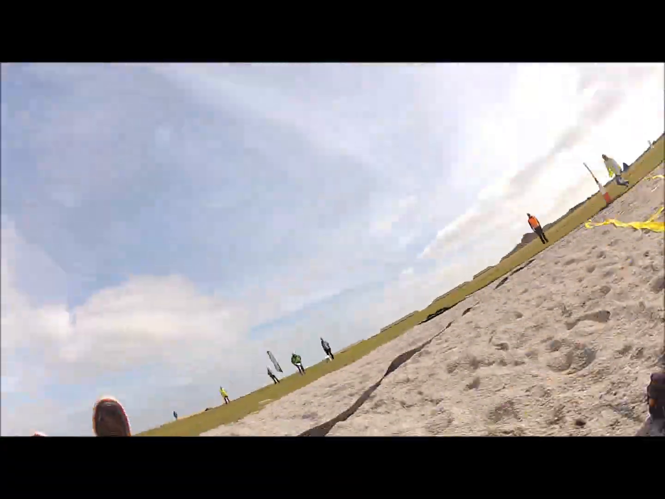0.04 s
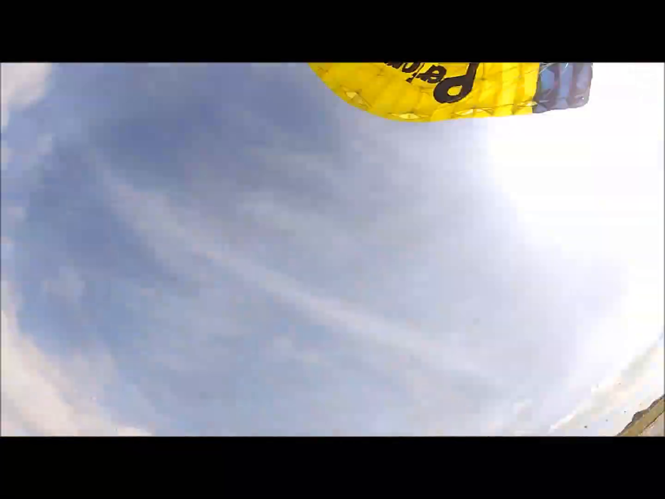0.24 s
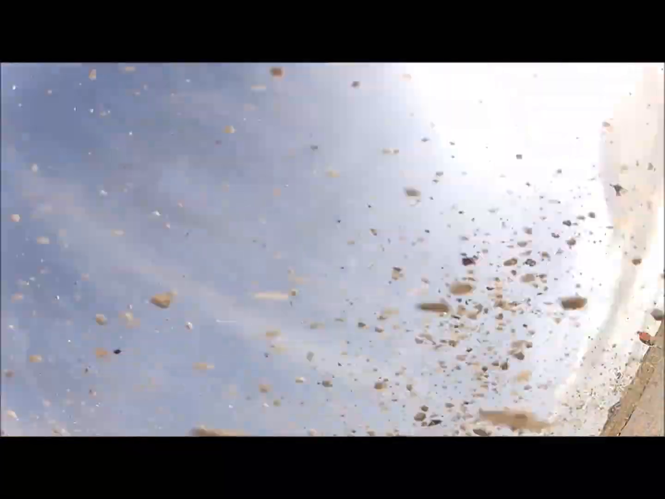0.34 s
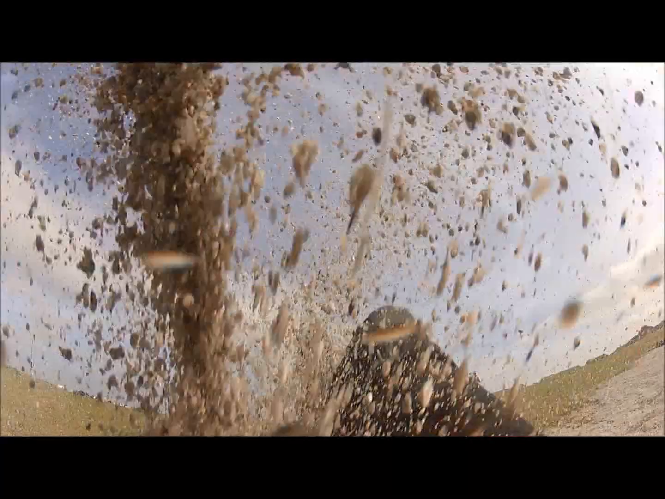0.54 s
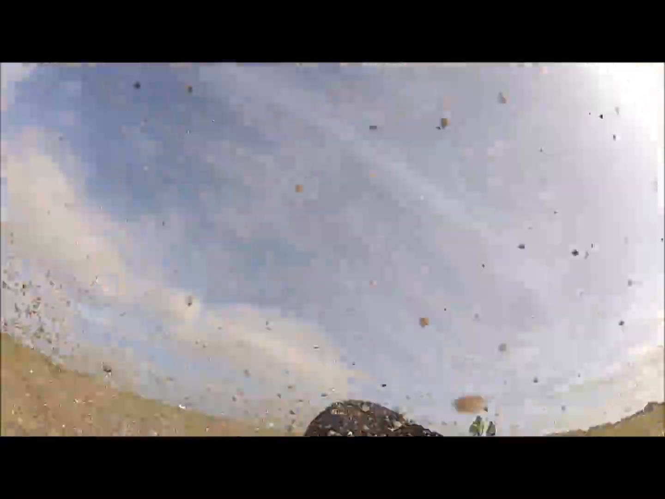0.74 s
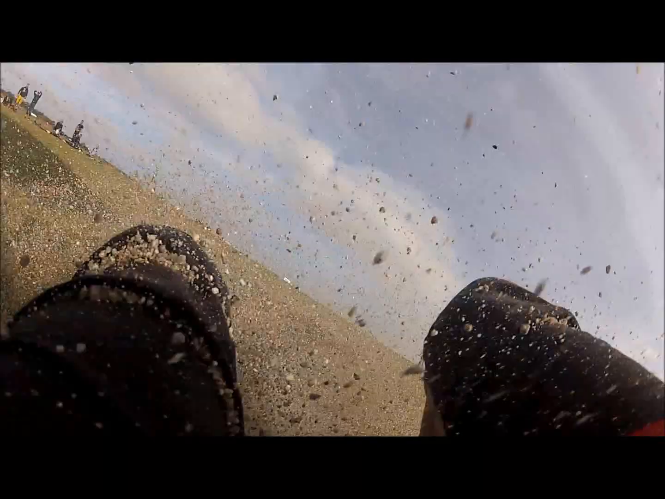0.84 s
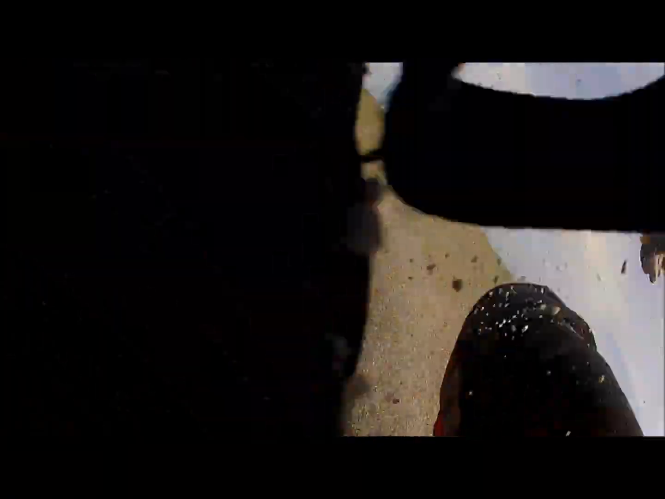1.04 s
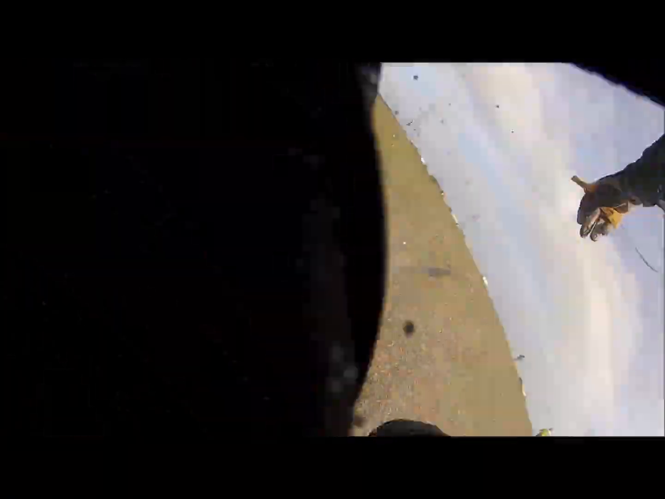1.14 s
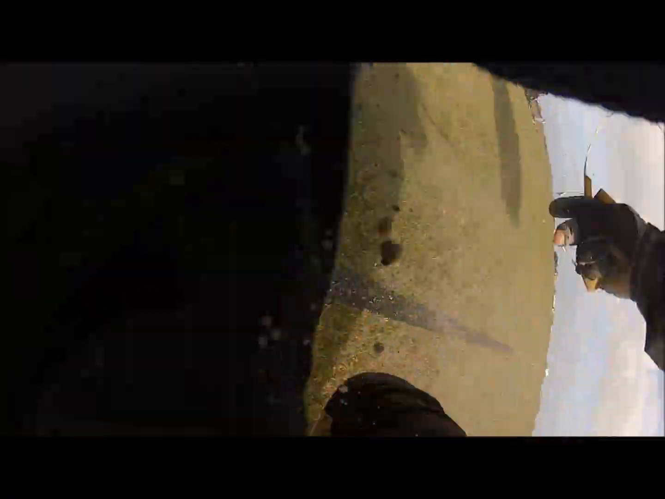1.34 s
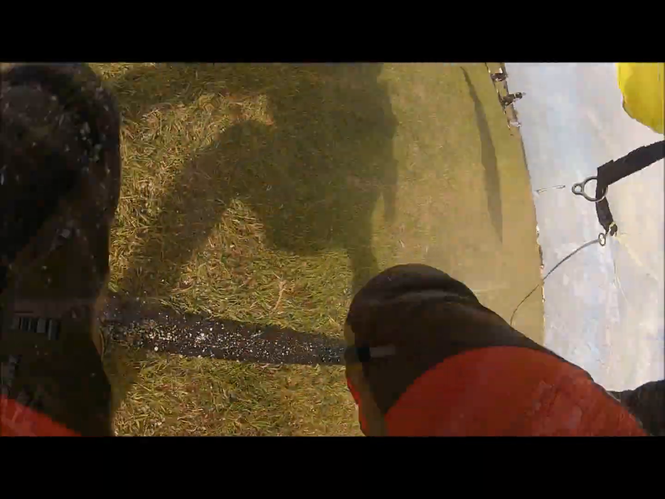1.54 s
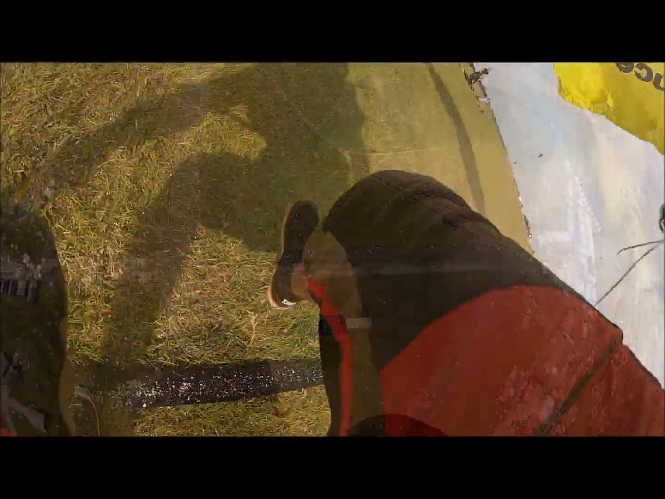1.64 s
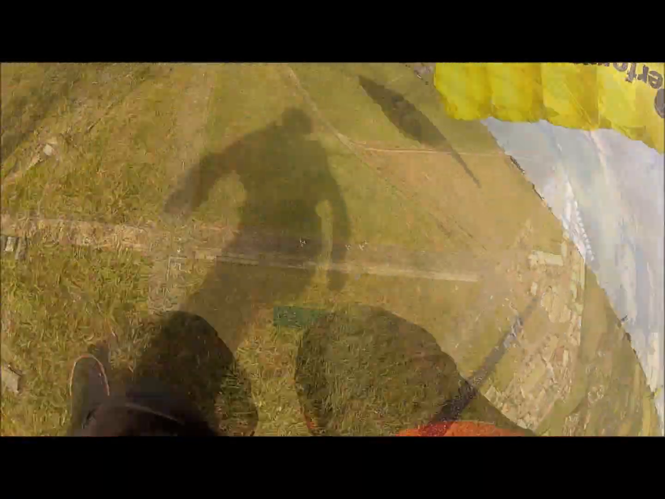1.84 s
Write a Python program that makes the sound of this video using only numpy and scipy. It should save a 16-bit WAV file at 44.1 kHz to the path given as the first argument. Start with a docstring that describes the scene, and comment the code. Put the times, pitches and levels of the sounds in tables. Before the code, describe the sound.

A body lands hard, with irregular thumps, knocks and sandy scrapes close up in buffeting wind.

```python
"""A parachutist's hard landing, heard from a camera worn on the body. Wind buffets the microphone.
From touchdown at 0.2 s, each jolt thumps the camera, and gear and clods knock on its plastic housing;
the hardest blows overload it. The body ploughs through sand, which scrapes and patters on the housing.
After 1 s buckles clink, and from 1.4 s grass hisses past as the body tumbles onto it."""
import sys
import numpy as np
from scipy import signal
from scipy.fft import rfft, irfft
from scipy.io import wavfile

SR = 44100
rng = np.random.default_rng(int(sys.argv[2]) if len(sys.argv) > 2 else 0)


def transcribe(signal):
    """Save signal, clipped to [-1, 1], as a 16-bit WAV file at the path in sys.argv[1]."""
    frames = np.atleast_2d(signal).T
    limited = np.clip(frames, -1, 1)
    pcm = np.round(limited * 32767).astype(np.int16)
    wavfile.write(sys.argv[1], SR, pcm)


N = 83790
CONTACT_EDGE_S = 0.0001  # onset of knocks and clinks


def undb(db):
    """Decibels to gain."""
    return 10 ** (np.asarray(db) / 20)


def unit(x):
    """Scale to rms 1."""
    return x / np.sqrt(np.mean(x ** 2) + 1e-18)


def curve(points):
    """Gain over time from (s, dB) points."""
    s, db = np.array(points).T
    return undb(np.interp(np.arange(N) / SR, s, db))


def wander(per_s):
    """Ramps between random values, `per_s` a second."""
    steps = rng.standard_normal(4000)
    return 0.67 * np.interp(np.arange(N) / SR * per_s, np.arange(len(steps)), steps)


def cut(x, hz, kind, order=2):
    """Butterworth low-, high- or band-pass."""
    return signal.sosfilt(signal.butter(order, hz, kind, fs=SR, output="sos"), x)


def band(x, hz, width_hz, order=2):
    """Band-pass centred on `hz`."""
    return cut(x, [hz - width_hz / 2, hz + width_hz / 2], "bandpass", order)


def tint(x, points):
    """Shape the spectrum by (Hz, dB) points."""
    hz, db = np.array(points).T
    bins_hz = np.fft.rfftfreq(len(x), 1 / SR)
    gain = undb(np.interp(np.log(bins_hz + 1), np.log(hz), db))
    return irfft(rfft(x) * gain, len(x))


def add(out, start_s, sound):
    """Mix a sound in at its time."""
    i = max(int(start_s * SR), 0)
    out[i:i + len(sound)] += sound[:N - i]


def rise_decay(t, rise_s, t60_s):
    """Envelope of a blow: fast rise, exponential decay."""
    return (1 - np.exp(-t / rise_s)) * np.exp(-np.log(1000) * t / t60_s)


def grains(per_s, scatter_db):
    """Tiny impacts of random sign and size at random times."""
    hits = (rng.random(N) < per_s / SR) * np.sign(rng.standard_normal(N))
    return hits * undb(scatter_db * np.minimum(rng.exponential(size=N), 3.5))


def housing(size=1024):
    """Impulse response of the plastic housing: broad resonances, deep valleys between."""
    # Each row: resonance in Hz, width in Hz, level in dB.
    modes = [(323, 300, -2), (787, 280, -3), (1214, 300, 3), (1882, 444, 6), (2343, 195, 0.5),
             (2865, 340, -0.5), (3660, 596, 1.5), (4680, 530, -5.5), (5253, 530, -4.5), (6900, 830, -7.5),
             (8470, 950, -6), (10040, 714, -6), (14000, 600, -6.5), (15600, 600, -14)]
    leak_db, dip_db = -21, -12
    f = np.fft.rfftfreq(size, 1 / SR)

    def bell(hz, width_hz):
        return .5 ** ((2 * (f - hz) / width_hz) ** 2)

    power = undb(leak_db) ** 2 + sum(undb(db) ** 2 * bell(hz, width_hz) for hz, width_hz, db in modes)
    power *= undb(dip_db * bell(hz=12200, width_hz=1460)) ** 2
    cepstrum = irfft(np.log(power))[:size // 2]  # causal half: minimum phase
    cepstrum[0] /= 2
    return irfft(np.exp(rfft(cepstrum, size)))


def wind():
    """Low, fluttering buffets on the microphone swell as the body is flung about."""
    # Buffet strength. Each row: time in seconds, level in dB.
    levels = [(0, -34), (.09, -40), (.16, -37), (.24, -23), (.30, -26.5), (.36, -18), (.41, -34.5),
              (.49, -31), (.565, -33), (.61, -35.5), (.66, -24), (.72, -28), (.77, -44), (.83, -60),
              (.87, -44.5), (.92, -25), (.98, -25.5), (1.03, -33.5), (1.08, -29), (1.15, -38),
              (1.21, -28.5), (1.30, -26.5), (1.36, -37.5), (1.43, -23), (1.5, -32.5), (1.63, -33.5),
              (1.69, -33), (1.78, -37.5), (1.9, -33.5)]
    # Wind spectrum. Each row: frequency in Hz, relative density in dB.
    spectrum = [(10, 4.5), (28, 4), (55, -2.5), (110, 3), (180, -8), (280, -8.5), (420, -23.5),
                (650, -41.5), (1200, -83), (3000, -87)]
    flutter_db = 4
    air = tint(rng.standard_normal(N), spectrum)
    return unit(air * undb(flutter_db * wander(per_s=23))) * curve(levels)


def grass(housing_ir):
    """Grass brushes past in a smooth hiss as the slide runs out."""
    # Each row: time in seconds, hiss level in dB.
    levels = [(1.4, -75), (1.6, -53.5), (1.9, -61.5)]
    hiss = signal.fftconvolve(rng.standard_normal(N), housing_ir)[:N]
    return unit(cut(hiss, hz=5900, kind="highpass")) * curve(levels)


def scrape(housing_ir):
    """Cloth, sand and grass rub in uneven jerks: dense grains through the housing."""
    # Each row: time in seconds, rubbing level in dB.
    levels = [(0, -61), (.11, -52), (.165, -57.5), (.19, -32.5), (.24, -38), (.30, -45.5), (.345, -51),
              (.405, -46), (.43, -42), (.51, -47), (.565, -51), (.61, -51), (.66, -35.5), (.715, -44),
              (.77, -52), (.82, -60), (.87, -59), (.905, -47.5), (.95, -33.5), (1.03, -44.5), (1.06, -35.5),
              (1.10, -45.5), (1.17, -43.5), (1.25, -39.5), (1.33, -36.5), (1.38, -44), (1.46, -42),
              (1.56, -40), (1.625, -38.5), (1.67, -40.5), (1.9, -45.5)]
    # Rubbing spectrum without the housing. Each row: frequency in Hz, gain in dB.
    spectrum = [(250, -1), (600, 2), (1300, 2), (2600, 3), (3500, 0), (4400, -30), (7000, -26), (9500, -1),
                (14500, -2)]
    judder_db = 2.5
    rub = grains(per_s=14000, scatter_db=2.5) * undb(judder_db * wander(per_s=150))
    housed = signal.fftconvolve(rub, housing_ir)[:N]
    return unit(tint(housed, spectrum)) * curve(levels)


def sand(housing_ir):
    """Thrown sand patters on the housing: thin spray is smoother, heavy spray clumps."""
    # Each row: time in seconds, spray level in dB.
    levels = [(0, -54), (.16, -66), (.2, -35), (.27, -49.5), (.31, -55), (.35, -58), (.405, -49.5),
              (.435, -32.5), (.47, -38.5), (.505, -37), (.565, -61), (.615, -51.5), (.65, -36), (.71, -29),
              (.77, -43), (.82, -52), (.87, -53), (.93, -37), (.98, -41), (1.03, -48), (1.11, -49.5),
              (1.2, -44), (1.3, -36.5), (1.38, -45.5), (1.48, -40), (1.56, -51), (1.62, -45), (1.68, -55)]
    flow = curve(levels)
    clump_db = 9 * (flow / flow.max()) ** 0.081
    spray = grains(per_s=6500, scatter_db=3.5) * undb(clump_db * wander(per_s=390))
    patter = signal.fftconvolve(spray, housing_ir)[:N]
    return unit(cut(patter, hz=1340, kind="highpass")) * flow


def clinks():
    """Harness buckles and links ring briefly, each at its own pitches."""
    # Each row: start in seconds, level in dB, three pitches in Hz.
    buckles = [(1.076, -15.5, 824, 2000, 3650), (1.272, -13, 1016, 1183, 3380),
               (1.318, -19, 2800, 5400, 6560), (1.503, -28, 2680, 4360, 6760),
               (1.625, -24, 1230, 1740, 2270)]
    out, t = np.zeros(N), np.arange(SR // 16) / SR
    envelope = rise_decay(t, CONTACT_EDGE_S, t60_s=0.021)
    for start_s, db, *pitches_hz in buckles:
        tones = sum(np.sin(2 * np.pi * (hz * t + rng.random())) for hz in pitches_hz)
        add(out, start_s, undb(db) * tones * envelope)
    return out


def thumps():
    """Each jolt swings the camera on its mount, sinking in pitch; padding crumples, the case buzzes."""
    # Each row: start in seconds, relative peak in dB, initial pitch in Hz, t60 in seconds.
    jolts = [(.127, -22, 171, 0.029), (0.202, -8, 237, 0.013), (0.2087, -3.5, 104.3, 0.043),
             (0.2213, -6.5, 87.5, 0.026), (0.231, -4.5, 103, 0.0095), (0.258, -26, 400, 0.087),
             (0.284, -27, 95, 0.12), (0.3306, -3, 111.5, 0.047), (0.3578, -10, 178, 0.019),
             (0.3803, -7.5, 251, 0.027), (.429, -20, 98, 0.048), (0.464, -17, 140, 0.034),
             (0.485, -19, 216, 0.051), (.5352, -6.5, 277, 0.011), (0.5917, -16.5, 208, 0.024),
             (0.625, -13, 131, 0.023), (0.64, -18, 99, 0.068), (0.696, 5.5, 141, 0.0073),
             (0.7538, -19, 220, 0.0047), (.789, -35, 194, 0.044), (0.893, -8, 268, 0.012),
             (.991, -13.5, 161, 0.019), (1.049, -6, 99, 0.0092), (1.068, -11, 183, 0.022),
             (1.198, -6, 137, 0.012), (1.273, -15.5, 171, 0.014), (1.404, -22, 74.5, 0.069),
             (1.428, -14.5, 176, 0.021), (1.4633, -20.5, 256, 0.025), (1.527, -16.5, 134, 0.041),
             (1.602, -12, 200, 0.0062), (1.6083, -14.5, 129, 0.043), (1.625, -12, 191, 0.013),
             (1.865, -30.5, 170, 0.13)]
    # Case buzz. Each row: frequency in Hz, relative level in dB.
    case_modes = [(10100, 1), (12000, -1), (14100, 0)]
    # The padded mount keeps the swing low. Each row: frequency in Hz, gain in dB.
    mount_response = [(400, 0), (700, -14.5)]
    gain_db, rustle_db, buzz_db, sag_per_s = 2, -18.5, -29, 15.3
    swing, force, t = np.zeros(N), np.zeros(N), np.arange(SR // 8) / SR
    for start_s, db, hz, t60_s in jolts:
        envelope = rise_decay(t, rise_s=0.0013, t60_s=t60_s)
        envelope = undb(db + gain_db) * envelope / envelope.max()
        pitch_hz = hz / (1 + sag_per_s * t)
        add(swing, start_s, envelope * np.sin(2 * np.pi * np.cumsum(pitch_hz) / SR))
        add(force, start_s, envelope)
    padding = cut(rng.standard_normal(N), hz=390, kind="lowpass")
    case = sum(undb(db) * band(rng.standard_normal(N), hz, width_hz=700) for hz, db in case_modes)
    rustle = undb(rustle_db) * unit(padding) * force
    buzz = undb(buzz_db) * unit(case) * force ** 0.89
    return tint(swing, mount_response) + rustle + buzz


def knocks(housing_ir):
    """Gear and clods strike and rattle; the chatter rings both the piece and the housing."""
    # Each row: start in seconds, contact in seconds, pitch of the piece in Hz,
    # then relative levels in dB of four registers: hollow ring, main ring, crack, sizzle.
    strikes = [(0.0824, 0.0015, 5540, -53, -51, -40, -45.5), (0.1254, 0.0036, 1320, -38, -37, -63, -60),
               (0.2008, 0.00279, 1940, -17.5, -8, -23, -22.5),
               (0.209, 0.0031, 1260, -21.5, -35, -41.5, -41), (0.217, 0.00054, 1770, -30, -12.5, -25, -35),
               (0.225, 0.0059, 1900, -28, -26.5, -41.0, -49),
               (0.241, 0.0015, 3560, -25.5, -21, -23.5, -26.5),
               (0.3315, 0.0041, 1020, -23, -18.5, -49, -44), (0.3426, 0.0022, 2130, -33, -22, -33.5, -37),
               (0.351, 0.0073, 1840, -37, -29, -44, -47), (0.3798, 0.0043, 3585, -25, -22, -30, -35.5),
               (0.387, 0.0021, 2040, -31, -23, -46, -35), (0.4212, 0.0023, 4460, -30.5, -18, -20, -24.5),
               (0.4294, 0.0013, 3700, -49, -34, -21.5, -27), (0.4356, 0.0017, 4830, -50, -32, -33, -40),
               (0.4626, 0.0018, 1790, -24.5, -13.5, -35, -28.5), (0.484, 0.002, 2260, -39, -25, -34, -45),
               (0.4965, 0.0033, 4040, -57, -31, -26.5, -32), (0.505, 0.0074, 2100, -61, -30, -32.5, -40),
               (0.534, 0.00088, 2200, -15, -17.5, -21, -23),
               (0.5365, 0.0029, 1910, -25, -15.0, -29.5, -27.5),
               (0.5443, 0.0048, 3830, -44, -40, -32.5, -35), (0.578, 0.00056, 1740, -24, -18, -49, -36.5),
               (0.626, 0.001, 1980, -21.5, -16.5, -47, -33), (0.6345, 0.0016, 2140, -46, -18, -21.5, -27.0),
               (0.67, 0.0012, 2630, -27, -20, -26, -34), (0.687, 0.0035, 3740, -31.5, -16, -17.0, -21),
               (0.6957, 0.0012, 3540, -29, -19, -9.5, -28), (0.6997, 0.0033, 3460, -32, -18.5, -13.5, -19),
               (0.702, 0.0024, 3850, -18, -16.5, -15.5, -23), (0.7143, 0.0015, 2000, -31, -15.5, -29, -32),
               (0.716, 0.0027, 1950, -37.0, -28, -37, -43), (0.736, 0.0023, 1800, -32, -31, -29, -46),
               (0.7488, 0.0011, 2530, -37, -15.5, -17, -22.5), (0.753, 0.0015, 3300, -35, -20.5, -15, -21),
               (0.759, 0.0059, 2120, -41, -22, -26, -30.5), (0.777, 0.0055, 2100, -44, -37, -34, -44),
               (0.802, 0.0014, 2180, -41, -30.5, -33, -39.5), (0.851, 0.0013, 2900, -47, -29.5, -30.5, -36),
               (0.892, 0.0026, 1140, -23, -19.5, -38, -31.5),
               (0.897, 0.0076, 2740, -36.5, -32, -31.5, -37.5),
               (0.936, 0.0039, 1940, -38.0, -29, -42.0, -41.0),
               (0.9913, 0.0027, 1930, -14, -9.5, -24, -23.5), (1.01, 0.0011, 5050, -55, -32, -40, -42),
               (1.0494, 0.0017, 1390, -17.5, -17, -39, -34), (1.0551, 0.0027, 1760, -32, -17, -44, -30.5),
               (1.059, 0.0014, 5240, -39.0, -34.0, -26, -32), (1.0743, 0.0054, 1990, -18, -14, -22.5, -24),
               (1.128, 0.00084, 3410, -37, -38, -32, -37), (1.1856, 0.0018, 4040, -34, -27, -20.5, -27.5),
               (1.1949, 0.0038, 1870, -24.5, -20.5, -48, -36),
               (1.2547, 0.0019, 2000, -20.5, -16.5, -42, -32),
               (1.271, 0.0015, 1810, -15.5, -8.5, -19.5, -20), (1.2916, 0.0019, 2280, -49, -23.5, -43, -42),
               (1.3167, 0.0025, 4900, -22.5, -19.5, -17.5, -22.5),
               (1.3303, 0.0012, 1290, -46, -29, -32, -34), (1.419, 0.00083, 4470, -28, -22, -21.5, -29),
               (1.463, 0.0014, 1330, -27, -23, -43, -37), (1.5014, 0.0013, 4350, -34, -24.5, -19, -26),
               (1.5273, 0.0028, 1670, -28.5, -20, -38, -34.5), (1.6005, 0.0023, 1290, -26, -33, -49, -49),
               (1.608, 0.013, 4800, -36.5, -34, -32.5, -36.5), (1.6236, 0.0049, 1695, -25, -20, -39, -35.5)]
    # The five edges of those registers in Hz.
    edges_hz = [480, 1400, 2800, 6000, 16500]
    gain_db, scatter_db, piece_db = 0.5, 1.5, 6.5
    onset_db, onset_s, lead_s = -22, 0.0027, 0.008  # faint noise swell softens each attack
    rattle_db, rattle_s = -11.5, 0.0034  # loose parts settle after contact
    out, t = np.zeros(N), np.arange(2048) / SR - lead_s
    registers = [cut(housing_ir, pair, "bandpass", order=3) for pair in zip(edges_hz, edges_hz[1:])]
    for start_s, contact_s, hz, *levels_db in strikes:
        push, size = rng.standard_normal((2, len(t)))
        touched, released = (.5 + .5 * np.tanh((t - at) / CONTACT_EDGE_S) for at in (0, contact_s))
        soft_onset = undb(onset_db) * np.exp(-abs(t) / onset_s) * (1 - touched)
        rattle = undb(rattle_db) * np.exp(-abs(t - contact_s) / rattle_s) * released
        chatter = push * undb(scatter_db * size) * (soft_onset + touched - released + rattle)
        chatter += undb(piece_db) * band(chatter, hz, width_hz=256, order=1)
        contact_gain = np.sqrt(contact_s * SR / len(t))  # energy grows with contact time
        for register, db in zip(registers, levels_db):
            ring = unit(signal.fftconvolve(chatter, register)[:len(t)])
            add(out, start_s - lead_s, ring * undb(db + gain_db) * contact_gain)
    return out


def scene():
    """Blows, ground noise and wind sum at one microphone."""
    housing_ir = housing()
    blows = knocks(housing_ir) + clinks() + thumps()
    ground = scrape(housing_ir) + sand(housing_ir) + grass(housing_ir)
    return (blows + ground + wind())[None]


def record(dry):
    """The lowest rumble is removed, the microphone clips on the hardest blows, and the top is cut."""
    clip_level, top_hz = 0.44, 15900
    highpassed = cut(dry, hz=14.6, kind="highpass", order=1)
    clipped = np.clip(highpassed, -clip_level, clip_level)
    return signal.sosfiltfilt(signal.butter(12, top_hz, fs=SR, output="sos"), clipped)


dry = scene()
out = record(dry)
transcribe(out)
```